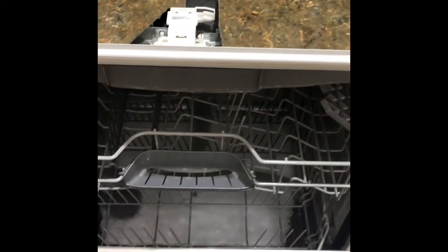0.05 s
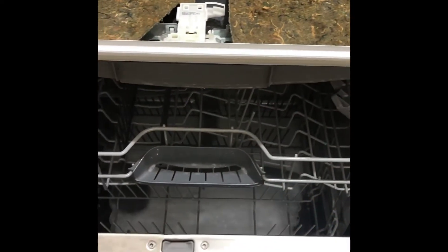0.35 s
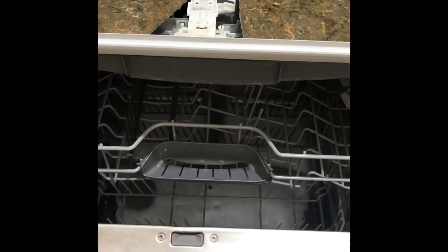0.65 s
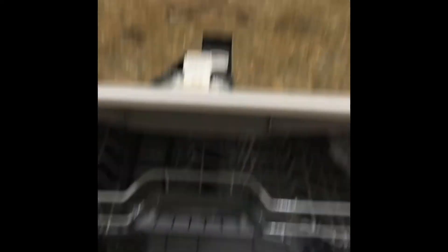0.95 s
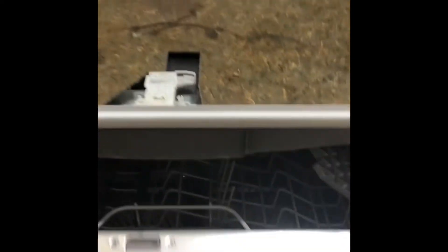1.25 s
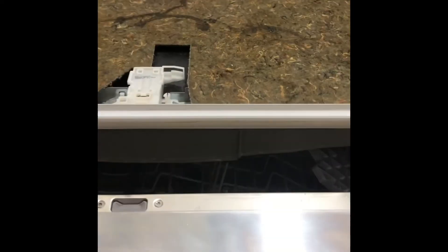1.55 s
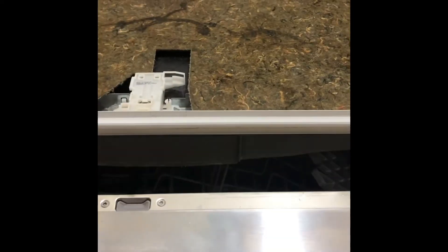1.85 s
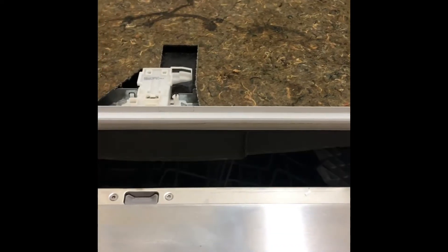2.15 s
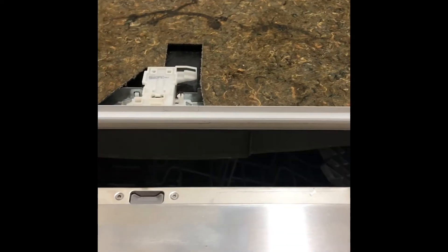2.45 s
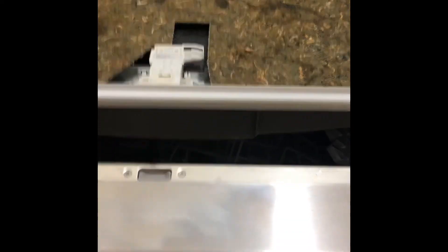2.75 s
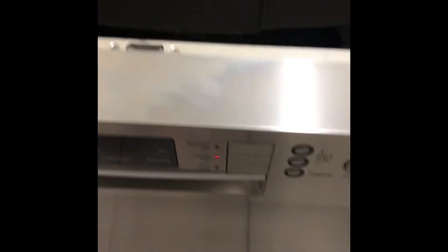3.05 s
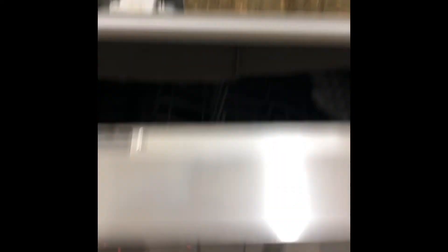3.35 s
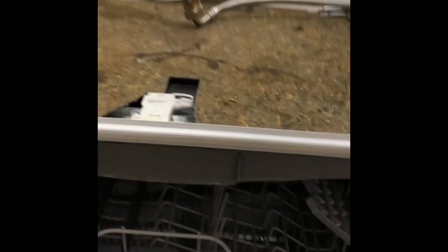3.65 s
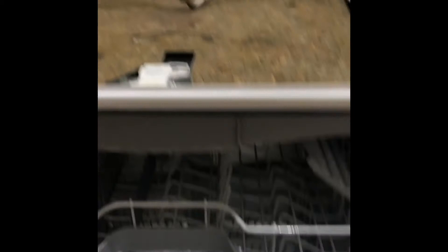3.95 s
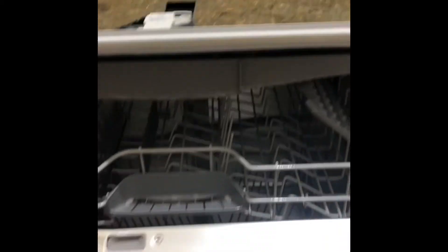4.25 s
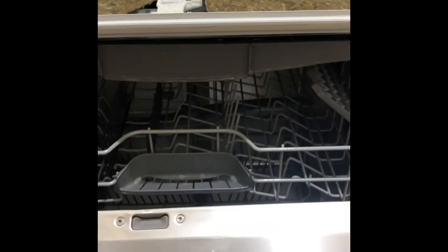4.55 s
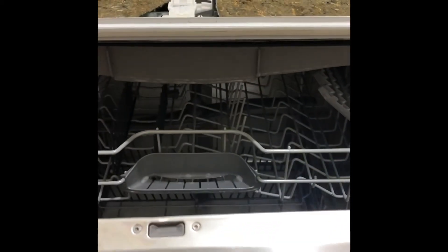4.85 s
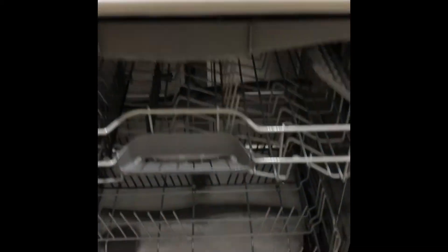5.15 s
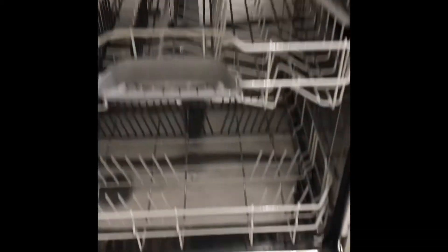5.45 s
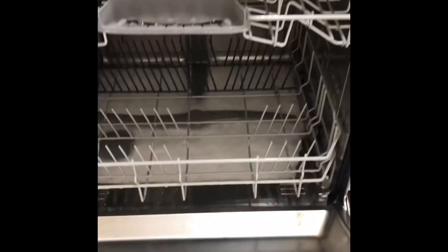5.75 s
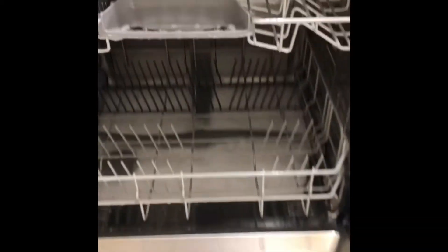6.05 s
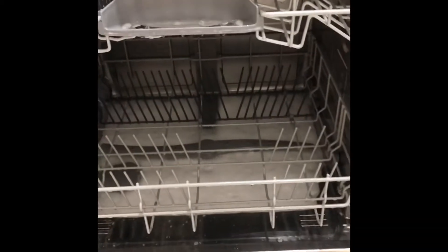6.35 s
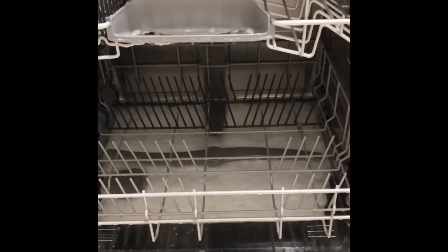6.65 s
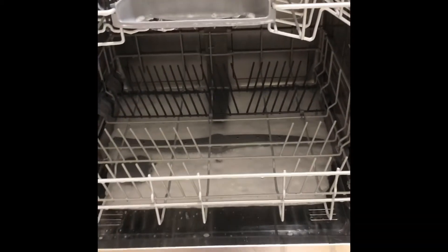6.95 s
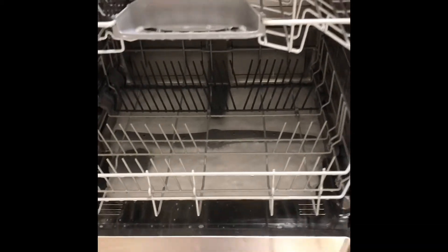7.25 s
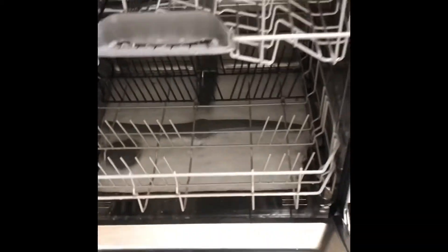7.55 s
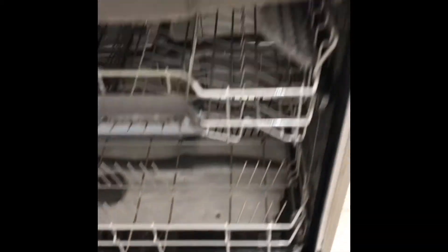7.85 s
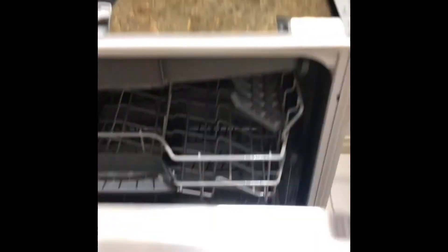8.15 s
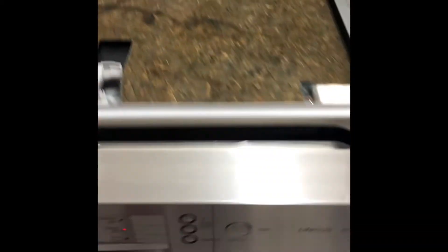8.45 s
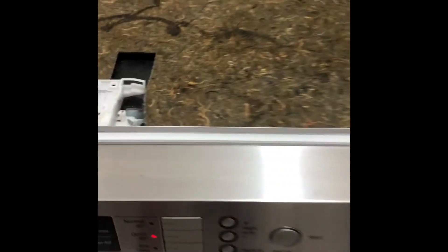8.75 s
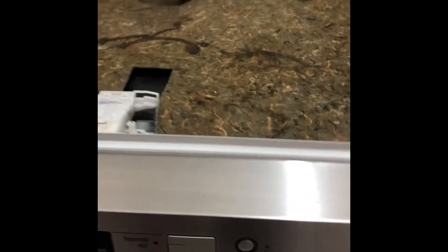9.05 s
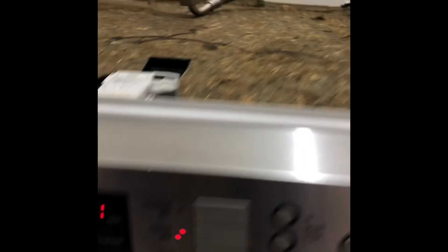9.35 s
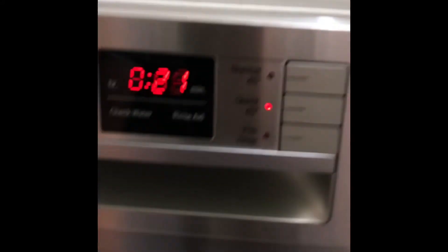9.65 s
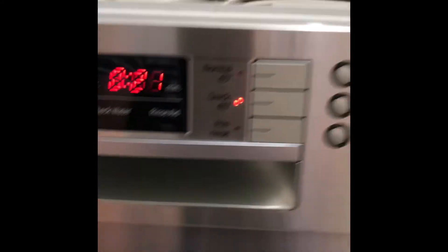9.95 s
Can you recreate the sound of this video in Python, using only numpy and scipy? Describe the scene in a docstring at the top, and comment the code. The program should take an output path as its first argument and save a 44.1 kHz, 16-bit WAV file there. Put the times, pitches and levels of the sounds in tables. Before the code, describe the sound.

Water drips and trickles inside an open dishwasher; the door knocks and rumbles, snaps loudly shut, and a faint pump and spray start.

```python
"""Water trickles, drips and plops in the steel tub of a dishwasher standing open in mid-cycle.
A hand swings the door, which knocks, rubs and rumbles on its hinges, then pushes it shut with a loud
snap of the latch. Behind the closed door the pump hums and the first jets splash on the walls.
Heard in mono, from one microphone close to the machine in a quiet kitchen."""
import sys
import numpy as np
from scipy import signal
from scipy.fft import rfft, irfft
from scipy.io import wavfile

SR = 44100
rng = np.random.default_rng(int(sys.argv[2]) if len(sys.argv) > 2 else 0)


def to_wav(s):
    """Save 16-bit WAV."""
    ch = np.atleast_2d(s).T  # columns
    pcm = np.round(np.clip(ch, -1, 1) * 32767)  # PCM
    wavfile.write(sys.argv[1], SR, pcm.astype(np.int16))


N = 440559
T = np.arange(N) / SR
SHUT_S = 8.5

# spectrum of a drop hitting steel: (frequency [Hz], level [dB])
DROP_SPECTRUM = [(200, -1.5), (1000, 8), (3000, 2), (5000, 2), (8000, -3), (12000, -4), (16000, -1.5)]
# spectrum of a knock, tick or slap: (frequency [Hz], level [dB])
KNOCK_SPECTRUM = [(50, -15.5), (200, -3.5), (600, -2), (1300, -4), (2200, -8), (3300, -6), (5500, -19),
                  (9000, -23), (16000, -34)]


def amp(db):
    """Decibels to gain."""
    return 10 ** (np.asarray(db) / 20)


def unit(x):
    """Scales to rms 1."""
    return x / np.sqrt(np.mean(x ** 2) + 1e-20)


def at_frequency(points, hz):
    """Interpolates a table on a log-frequency axis."""
    frequencies, values = np.transpose(points)
    return np.interp(np.log(hz + 1), np.log(frequencies + 1), values)


def over_time(points):
    """Interpolates a table of (time, value) at every sample."""
    return np.interp(T, *np.transpose(points))


def door_open():
    """1 while the tub is open, falling to 0 as the latch catches."""
    return np.interp(T, [SHUT_S - .1, SHUT_S], [1, 0])


def arch(start, length, peakiness):
    """One swell and ebb; a small peakiness gives a flat top."""
    progress = (T - start) / length
    return np.maximum(4 * progress * (1 - progress), 0) ** peakiness


def colour(x, spectrum, bass_db=0, treble_db=0, ring_hz=1000, ring_db=0, size=4096):
    """Minimum-phase filter of unit energy: a spectrum, two shelves and one broad resonance."""
    hz = abs(np.fft.fftfreq(size, 1 / SR))
    shelves = bass_db / (1 + (hz / 700) ** 2) + treble_db * hz ** 2 / (hz ** 2 + 5000 ** 2)
    resonance = ring_db / (1 + ((hz / ring_hz - 1) / .14) ** 2)
    log_gain = np.log(amp(at_frequency(spectrum, hz) + shelves + resonance))
    taps = np.fft.ifft(np.exp(np.conj(signal.hilbert(log_gain)))).real[:size // 2]
    return signal.fftconvolve(x, taps / np.linalg.norm(taps))[:len(x)]


def resonate(x, response):
    """Passes a sound through an impulse response scaled to unit energy."""
    return signal.fftconvolve(x, response / np.linalg.norm(response))[:N]


def drift(rate_hz):
    """Random wander of rms 1, mostly slower than rate_hz."""
    rolloff = 1 + (np.fft.rfftfreq(N, 1 / SR) / rate_hz) ** 4
    return unit(irfft(rfft(rng.standard_normal(N)) / rolloff, N))


def add(mix, start, sound):
    """Mixes a sound in at a start time in seconds."""
    part = mix[max(round(start * SR), 0):][:len(sound)]
    part += sound[:len(part)]


def burst(decay_s, rise_s=0.000067, size=12000):
    """A contact: dense chatter that dies away exponentially."""
    t = np.arange(size) / SR
    return rng.choice([-1., 1.], size) * np.exp(-t / decay_s) * (1 - np.exp(-t / rise_s))


def patter(per_s, spread_db):
    """Random impacts; a few stand out, louder for a positive spread and softer for a negative one."""
    sizes = amp(spread_db * np.minimum(rng.exponential(1, N), 3.5)) * rng.choice([-1., 1.], N)
    return sizes * (rng.random(N) < per_s / SR)


def ring(modes):
    """One second of decaying modes, each at a random phase."""
    t = np.arange(SR) / SR
    return sum(amp(db - 60 * t / t60) * np.sin(2 * np.pi * (hz * t + rng.random()))
               for hz, db, t60 in modes)


def strokes(x, moves, split_hz, peakiness):
    """Swells a friction sound once per move, each with its own gain above split_hz."""
    low = signal.lfilter(*signal.butter(1, split_hz, fs=SR), x)
    return sum(amp(db) * arch(start, length, peakiness) * (low + amp(treble_db) * (x - low))
               for start, length, db, treble_db in moves)


def bubble(hz, cycles, climb):
    """A bubble rings and climbs in pitch as it nears the surface."""
    age = np.arange(3000) / SR * hz / cycles
    pitch = hz * (1 + climb * (np.tanh(age) - .5))
    return np.sin(2 * np.pi * np.cumsum(pitch) / SR) * np.exp(-age) * (1 - np.exp(-6 * age))


def hollow_tub(x):
    """Air and panels of the tub favour a few low tones."""
    # resonances of tub and door: (frequency [Hz], bandwidth [Hz], level [dB])
    resonances = [(206.2, 4.7, 7), (329, 50, 7), (377, 110, -42), (630, 73, -31), (1015, 64, -13)]
    t = np.arange(SR // 4) / SR
    response = sum(amp(db) * np.sqrt(width) * np.exp(-np.pi * width * t) * np.cos(2 * np.pi * hz * t)
                   for hz, width, db in resonances)
    return resonate(x, response)


def runoff(gain_db=-3.5, gurgle_db=-3, rush_db=-4, hollow_db=-15, gulp_db=4.5):
    """Water runs down the walls into the sump in uneven gulps: many small bubbles in a soft rush."""
    # flow off the walls: (time [s], level [dB])
    flow_levels = [(0.0, -60.5), (2.1, -65.5), (2.99, -70.5), (3.3, -56), (3.65, -54), (4.07, -65),
                   (4.56, -69), (5.21, -57.5), (6.2, -58), (6.41, -74), (7.18, -59), (8.4, -54)]
    # pooled water letting go: (start [s], length [s], level [dB])
    gushes = [(1.035, 0.37, -59), (1.76, 0.58, -67.5), (2.43, 0.31, -62.5)]
    # running water: (frequency [Hz], level [dB])
    spectrum = [(40, -23), (90, -7.5), (200, -1.5), (320, -2.5), (600, -8), (1200, -9.5), (2000, -16.5),
                (4000, -13), (16000, -35.5)]
    bubbles = np.zeros(N)
    for hz in np.geomspace(170, 2400, num=24):
        births = patter(per_s=16, spread_db=1.5)
        bubbles += signal.oaconvolve(births, unit(bubble(hz, cycles=5.3, climb=0.14)))[:N] * np.sqrt(hz)
    gurgle = amp(gurgle_db) * unit(colour(bubbles, spectrum))
    rush = amp(rush_db) * colour(rng.standard_normal(N), spectrum)
    hollow = amp(hollow_db) * unit(hollow_tub(bubbles))
    gulps = unit(amp(gulp_db * np.clip(drift(26), -1.5, 1.5)))
    flow = amp(over_time(flow_levels) + gain_db)
    for start, length, db in gushes:
        flow = np.maximum(flow, amp(db) * arch(start, length, peakiness=0.28))
    return flow * door_open() * gulps * (gurgle + rush + hollow)


def drizzle(gain_db=2, spread_db=3, count=560):
    """Small droplets patter from the racks, each at a pitch of its own."""
    # fine dripping thins out and returns: (time [s], level [dB])
    levels = [(0, -62.5), (1.1, -71.5), (2.3, -76.5), (3.4, -65), (4.1, -75), (4.7, -66.5), (6.15, -67),
              (6.42, -72.5), (7.4, -63.5), (8.4, -66.5)]
    out = np.zeros(N)
    for when, size, pitch in rng.random((count, 3)):
        splat = burst(decay_s=0.0033, rise_s=0.00047, size=2048)
        droplet = colour(splat, DROP_SPECTRUM, ring_hz=1500 * 2 ** (3 * pitch), ring_db=9, size=512)
        size_db = spread_db * min(-np.log(1 - size), 3)
        add(out, when * N / SR, amp(size_db) * droplet)
    return amp(over_time(levels) + gain_db) * door_open() * unit(out)


def knocks(knock_db=2, thump_db=1):
    """Hard contacts clack; the loose door panel gives low thumps."""
    # door, hinge and racks: (time [s], level [dB], bass [dB], treble [dB], decay [s], pitch [Hz])
    contacts = [(.018, -40, -3, -7, 0.014, 3080), (.045, -48, 20, 10, 0.017, 382),
                (.684, -53.5, 6, -29, 0.02, 696), (1.296, -49.5, 8, -6, 0.012, 350),
                (1.335, -56.5, 13, -10, .025, 219), (2.541, -54.5, 5, -26, 0.022, 650),
                (2.606, -50.5, 17, -3, 0.0084, 400), (2.929, -46.5, 13, -1, 0.011, 920),
                (3.013, -41, 5, 27, 0.0067, 3280), (3.033, -39.5, -10, -4, 0.0023, 800),
                (3.039, -39, -10, 8, 0.0092, 1300), (3.181, -37, 16, 15, 0.0022, 650),
                (3.211, -40, -11, -1, 0.0081, 1290), (4.050, -57, 26, -20, 0.0085, 397),
                (4.710, -41.5, -4, -3, 0.0039, 690), (4.775, -28, -7, 0, 0.0036, 2350),
                (6.050, -52.5, 20, -34, 0.099, 332), (6.127, -50, 16, -3, 0.025, 380),
                (6.553, -43, 7, 2, 0.037, 363), (6.700, -52, -9, -16, 0.013, 700),
                (6.895, -40, -19, 8.5, 0.02, 1450), (6.939, -48.5, 11, 26, 0.051, 3350),
                (7.097, -42, 6, -41, 0.0043, 900), (7.895, -43, -11, -9, .0035, 2500),
                (8.079, -42, -2, 7, 0.017, 3030), (8.216, -42, -17, -14, 0.0066, 3140),
                (8.240, -39, 12, -2, 0.0049, 1400)]
    # door panel: (time [s], level [dB], pitch [Hz], decay [s])
    thumps = [(2.551, -53, 165, 0.022), (2.748, -59, 90, 0.018), (3.373, -52, 90, 0.013),
              (3.472, -40.5, 135, 0.0098), (6.061, -65, 100, 0.022), (6.916, -51, 90, 0.017),
              (7.042, -43, 178, 0.018), (7.193, -43, 97, .032), (7.261, -48.5, 95.5, 0.035),
              (7.752, -39.5, 145, 0.069), (8.353, -46, 94.4, 0.17)]
    out = np.zeros(N)
    for start, db, bass_db, treble_db, decay_s, hz in contacts:
        clack = colour(burst(decay_s), KNOCK_SPECTRUM, bass_db, treble_db, ring_hz=hz, ring_db=5)
        add(out, start, amp(db + knock_db) * clack)
    for start, db, hz, decay_s in thumps:
        push = burst(decay_s)
        panel_spectrum = [(hz * 0.33, -28), (hz * 0.54, -2), (hz * 1.4, 0), (hz * 3, -20), (hz * 12, -60)]
        add(out, start, amp(db + thump_db) * unit(colour(push, panel_spectrum)) * np.std(push))
    return out


def drips(splat_s=0.0013, spatter_db=-12):
    """Drops flatten and spatter on the steel, each spot with its own pitch."""
    # loudest drops on tub and racks: (time [s], level [dB], pitch [Hz], tilt towards bass [dB])
    drops = [(.1925, -45, 4240, 8), (0.4247, -43, 3550, 2), (.4843, -44, 5790, -7), (0.5358, -42, 6170, -3),
             (.656, -45.5, 4060, -13), (.8932, -44.5, 3500, 0), (1.068, -45, 5960, -2),
             (1.1416, -43.5, 3120, -2), (1.4194, -40, 6050, 0.5), (1.7171, -43, 3320, 2),
             (2.024, -42.5, 6550, 2), (2.35, -43.5, 4600, 1), (2.687, -44, 4710, -24),
             (3.5034, -40.5, 5420, 13), (3.5735, -40, 4030, 3), (4.1838, -38.5, 7200, -3.5),
             (4.4358, -43.5, 3570, 0), (4.5074, -41, 12900, -10), (4.5372, -42.5, 4670, -5),
             (4.9086, -41, 11600, -5), (5.2956, -35, 4970, -18), (5.432, -39.5, 15000, -11),
             (5.577, -39.5, 2790, -10), (5.6688, -43, 3410, 1), (5.849, -44, 4230, -2),
             (5.9605, -39, 2870, -18), (6.118, -39, 4800, -7), (6.536, -40, 4800, 3),
             (7.2814, -42.5, 5330, 1), (7.4034, -42.5, 4270, -1)]
    out = np.zeros(N)
    for start, db, hz, tilt_db in drops:
        tick = burst(decay_s=0.0028, rise_s=splat_s)
        spatter = amp(spatter_db) * burst(decay_s=0.014, rise_s=splat_s)
        drop = colour(tick + spatter, DROP_SPECTRUM, tilt_db, -tilt_db, ring_hz=hz, ring_db=7)
        add(out, start, amp(db) * drop)
    return out


def plops(bubble_db=3, slap_db=-7):
    """A drop slaps the standing water and traps a short-lived bubble."""
    # drops into the sump: (time [s], level [dB], pitch [Hz], lean towards the bubble [dB])
    drops = [(0.269, -46, 1060, -7), (0.704, -46.5, 1062, -2), (0.803, -46.5, 1410, -7),
             (1.126, -46.5, 1640, -3.5), (1.25, -45.5, 1334, -1), (1.525, -45, 1170, -4),
             (1.911, -52, 1600, -12), (2.008, -47.5, 1200, -6), (2.485, -53, 1700, -13),
             (2.686, -45.5, 1070, -3), (3.596, -41, 1870, 0.5), (4.245, -40.5, 1690, -0.5),
             (4.459, -45.5, 1480, -5.5), (4.630, -46.5, 1500, -7), (5.516, -43.5, 1720, -4),
             (5.733, -44.5, 970, -0.5), (6.226, -41, 1250, -4.5), (6.766, -51, 1173, 8),
             (7.338, -41, 1437, 1.5)]
    out = np.zeros(N)
    for start, db, hz, lean_db in drops:
        add(out, start, amp(db + bubble_db + lean_db) * bubble(hz, cycles=6.0, climb=0.18))
        impact = burst(decay_s=0.011, rise_s=0.0016)
        slap = colour(impact, KNOCK_SPECTRUM, treble_db=3, ring_hz=hz, ring_db=9)
        add(out, start, amp(db + slap_db - lean_db / 2) * slap)
    return out


def door_swing(rumble_db=-3, hollow_db=-4, lumps_db=2):
    """The hinge springs slip in tiny steps and make the door rumble as long as it moves."""
    # moves of the door: (start [s], length [s], level [dB], treble [dB])
    moves = [(3.22, 0.47, -59.5, 3), (4.817, 0.89, -60.5, 7), (5.65, 0.76, -59, -12),
             (6.975, 0.093, -53, -0.5), (7.134, 0.28, -49.5, -7), (7.363, 0.9, -56.5, -0.5)]
    # rumbling door: (frequency [Hz], level [dB])
    spectrum = [(40, -10), (100, 1.5), (200, -2), (350, -3.5), (650, -0.5), (1200, -6.5), (2000, -14),
                (4000, -34), (12000, -27)]
    slips = unit(patter(per_s=2500, spread_db=-1.5) * amp(lumps_db * drift(24)))
    rumble = amp(rumble_db) * colour(slips, spectrum) + amp(hollow_db) * hollow_tub(slips)
    return strokes(rumble, moves, split_hz=400, peakiness=0.67)


def rubbing(grain_db=2):
    """Hand and seal slide on the door with a grainy hiss."""
    # sliding strokes: (start [s], length [s], level [dB], treble [dB])
    moves = [(3.586, 0.099, -48.5, -28), (3.623, .28, -53, 6), (3.917, 0.064, -50.5, -23),
             (7.575, 0.14, -45, -10), (7.91, 0.16, -57, -2.5), (8.32, 0.064, -57.5, 6),
             (8.378, 0.11, -46.5, -28)]
    # friction hiss: (frequency [Hz], level [dB])
    spectrum = [(200, -14.5), (900, -3.5), (1900, 0), (3500, -1.5), (7000, -4.5), (11000, -11),
                (16000, -13.5)]
    hiss = colour(rng.standard_normal(N) * amp(grain_db * drift(150)), spectrum)
    return strokes(hiss, moves, split_hz=4000, peakiness=0.68)


def groaning():
    """Hinge and rubber seal groan in a dense run of small slips as the door rises."""
    # groans: (start [s], length [s], level [dB])
    groans = [(7.801, 0.1, -48), (7.896, 0.11, -55.5), (8.379, 0.073, -44.5)]
    # slipping hinge and seal: (frequency [Hz], level [dB])
    spectrum = [(150, -25.5), (450, -4.5), (750, 2), (1400, -3.5), (2500, -13.5), (8000, -31.5)]
    slips = unit(colour(patter(per_s=1200, spread_db=-1.5), spectrum))
    return slips * sum(amp(db) * arch(start, length, peakiness=0.49) for start, length, db in groans)


def seal_squeak(start=8.394, length=0.026, gain_db=-38, hz=915, octave_db=-9, waver=.018):
    """The rubber seal squeaks once as the door meets it."""
    phase = 2 * np.pi * np.cumsum(hz * (1 + waver * drift(120))) / SR
    tone = unit(np.sin(phase) + amp(octave_db) * np.sin(2 * phase))
    return amp(gain_db) * arch(start, length, peakiness=1.1) * tone


def catch_ticks(start=8.444, step_s=.0087, first_db=-37, growth_db=2.4):
    """The catch jerks up its ramp in quick ticks, each louder and brighter as the spring tightens."""
    out = np.zeros(N)
    for k in range(4):
        tick = colour(burst(.003), KNOCK_SPECTRUM, treble_db=-4 + 6.5 * k, ring_hz=3700, ring_db=4.5)
        add(out, start + k * step_s, amp(first_db + k * growth_db) * tick)
    return out


def slam(gain_db=2):
    """The sprung latch cracks, and the door lands on its frame and rattles."""
    # blows of latch, then door: (time [s], level [dB], bass [dB], decay [s])
    blows = [(8.4754, -5.5, -16.5, 0.0012), (8.4793, -14, 4.5, 0.0016), (8.489, -14.5, 2, 0.0061),
             (8.492, -12.5, 0, .014), (8.505, -22, -7.5, 0.032)]
    # latch and frame: (frequency [Hz], level [dB])
    spectrum = [(25, -15), (55, -5.5), (200, -5.5), (340, -6), (450, -9), (690, -5.5), (920, -11.5),
                (1200, -7.5), (1750, -14.5), (2500, -12), (3600, -10.5), (4600, -14.5), (11300, -15.5),
                (16000, -22.5)]
    out = np.zeros(N)
    for start, db, bass_db, decay_s in blows:
        add(out, start, amp(db + gain_db) * colour(burst(decay_s), spectrum, bass_db))
    return out


def cabinet_boom(start=8.492, rise_s=0.0048):
    """The whole cabinet takes up the blow of the door and booms."""
    # cabinet modes: (frequency [Hz], level [dB], time to fall 60 dB [s])
    modes = [(49.5, -26, 0.31), (72, -26.5, 0.16), (108.3, -27.5, 0.34), (150.7, -31.5, 0.42),
             (198, -37.5, 0.75), (240, -30.5, 0.31), (317, -29, 0.26)]
    t = np.arange(SR) / SR
    out = np.zeros(N)
    add(out, start, ring(modes) * (1 - np.exp(-t / rise_s)))
    return out


def washing(clumps_db=2, pump_db=-59, fall_db_per_s=2, surge_db=9, settle_s=.25, jet_db=1):
    """Behind the shut door the pump surges and settles; spray and single jets hit the inside."""
    # sweeps of spray across the door: (start [s], length [s], level [dB])
    sweeps = [(8.58, .39, -50.5), (9.035, 0.46, -62.5), (9.388, 0.48, -66.5)]
    # first jets: (time [s], level [dB], decay [s])
    jets = [(8.788, -47.5, 0.02), (8.940, -52, 0.063), (9.071, -47.5, 0.049), (9.272, -58, .005),
            (9.301, -58, 0.033), (9.365, -48.5, 0.0058), (9.402, -52, 0.0033), (9.426, -47.5, 0.034)]
    # steady tones of the pump: (frequency [Hz], level [dB])
    hum_tones = [(102.3, -66.5), (861, -79.5), (1168, -80)]
    # spray, pump and jets from outside the door: (frequency [Hz], level [dB])
    spray_spectrum = [(200, -7), (900, -9), (1700, 4), (3300, 4), (6000, 2), (10000, -3.5), (16000, -11)]
    pump_spectrum = [(28, -21), (46, 7), (65, -5.5), (125, 1.5), (160, -3.5), (200, 4.5), (270, -7),
                     (450, -8.5), (1100, -22), (2500, -49), (16000, -79)]
    jet_spectrum = [(100, -1), (400, -1), (900, -4), (1600, 3), (2700, 5.5), (5000, -1), (9000, -12),
                    (16000, -16)]
    spray_gain = sum(amp(db) * arch(start, length, peakiness=0.53) for start, length, db in sweeps)
    droplets = patter(per_s=4600, spread_db=0) * amp(clumps_db * drift(32))
    out = spray_gain * unit(colour(droplets, spray_spectrum))
    age = np.maximum(T - SHUT_S, 0)
    pump_gain = amp(pump_db - fall_db_per_s * age + surge_db * np.exp(-age / settle_s))
    out += pump_gain * colour(rng.standard_normal(N), pump_spectrum)
    for start, db, decay_s in jets:
        add(out, start, amp(db + jet_db) * colour(burst(decay_s), jet_spectrum))
    hum_fade_in = np.interp(T, [8.7, 9.4], [0, 1])
    for hz, db in hum_tones:
        phase = 2 * np.pi * np.cumsum(hz * (1 + .004 * drift(19.5))) / SR
        out += hum_fade_in * amp(db) * unit(np.sin(phase))
    return (1 - door_open()) * out


def pump_whine(start=9.5, length=0.53, gain_db=-73, start_hz=3800, rise_hz_per_s=900, waver=0.067):
    """A faint, fuzzy whine climbs as the pump gathers speed."""
    hz = (start_hz + rise_hz_per_s * np.clip(T - start, 0, length)) * (1 + waver * drift(299.6))
    tone = unit(np.sin(2 * np.pi * np.cumsum(hz) / SR))
    return amp(gain_db) * arch(start, length, peakiness=0.64) * tone


def sheet_steel(x):
    """The sheet steel of tub and door rings on in its modes."""
    # steel modes: (frequency [Hz], level [dB], time to fall 60 dB [s])
    modes = [(167, -4, 0.82), (199, -13, 0.93), (571, -4.5, 0.19), (630, -14, .22), (700, -5, 0.17),
             (801, 8, .2), (881, 3, 0.33), (1064, -5.5, 0.27), (1166, -7, 0.43), (1240, -6, 0.1),
             (2140, -10, .33), (3030, -6, 0.45), (3020, 11, 0.083), (3180, -6.5, 0.32), (4000, -9, .3),
             (4900, -11, 0.42), (5604, -9, .33), (5800, -0.5, .13), (7180, -15, .3)]
    return resonate(x, ring(modes))


def kitchen(x, onset_s=0.0013, echoes_per_s=5000):
    """Dense reflections from tub and kitchen reach the microphone, each band dying at its own speed."""
    # reverberation: (frequency [Hz], time to fall 60 dB [s])
    decay_times = [(60, 0.62), (250, 0.54), (1000, 0.44), (3500, 0.37), (8000, 0.33), (15000, 0.13)]
    echoes = rng.choice([-1., 1.], SR) * (rng.random(SR) < echoes_per_s / SR)
    echoes *= 1 - np.exp(-np.arange(SR) / SR / onset_s)
    hz, t, bands = signal.stft(echoes, SR, nperseg=256)
    decay = amp(-60 * t / at_frequency(decay_times, hz)[:, None])
    return resonate(x, signal.istft(bands * decay, SR, nperseg=256)[1])


def room_tone(level_db=-65):
    """A faint, steady hush lies under everything."""
    # quiet kitchen: (frequency [Hz], level [dB])
    spectrum = [(25, -5), (60, 2), (100, 6), (190, 2), (750, -6.5), (1400, -5.5), (2100, -9.5), (3000, -11),
                (8600, -16.5), (15000, -18), (16000, -18.5)]
    return amp(level_db) * colour(rng.standard_normal(N), spectrum)


def scene():
    """At the microphone: the machine close by, its ringing steel and the kitchen around it."""
    water = drips() + drizzle() + plops() + runoff()
    door = knocks() + rubbing() + groaning() + seal_squeak() + catch_ticks()
    latch = slam()
    direct = water + door + latch + cabinet_boom() + door_swing() + washing() + pump_whine()
    ringing = sheet_steel(amp(-36.5) * (water + door) + amp(-19) * latch)
    reflections = kitchen(amp(-8) * (water + door) + amp(-9.5) * latch)
    return (direct + ringing + reflections + room_tone())[None]


def record(dry, low_hz=38, high_hz=16100):
    """The microphone sheds the deepest bass, and a steep filter cuts the highest treble."""
    thinned = signal.sosfilt(signal.butter(4, low_hz, "highpass", fs=SR, output="sos"), dry)
    lowpass = signal.firwin(511, high_hz, window=("kaiser", 9), fs=SR)
    return signal.oaconvolve(thinned, lowpass[None], "same")


dry = scene()
out = record(dry)
to_wav(out)
```